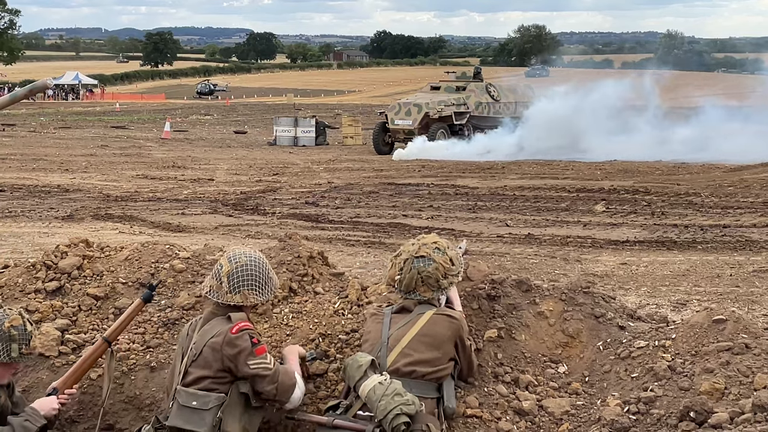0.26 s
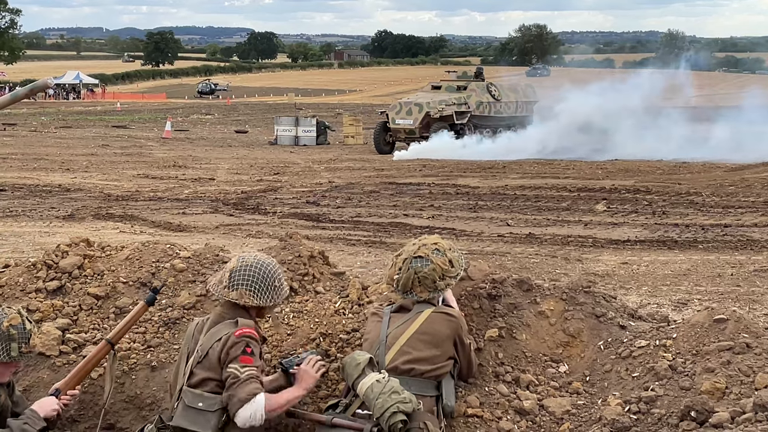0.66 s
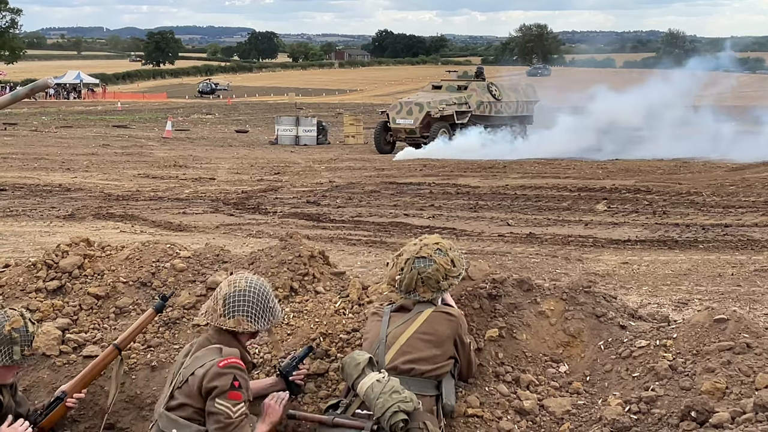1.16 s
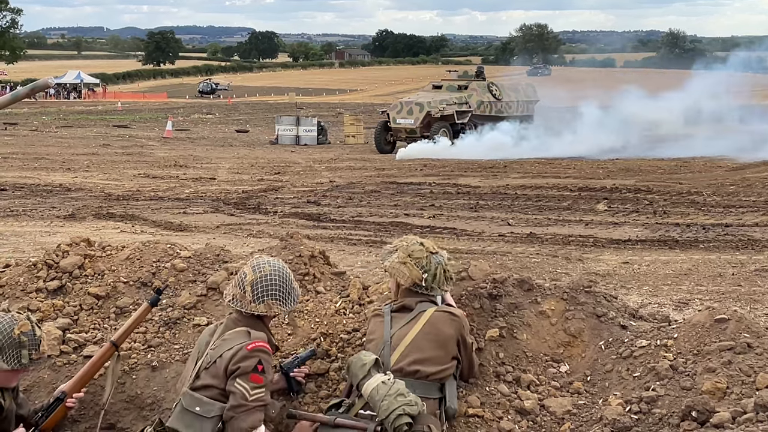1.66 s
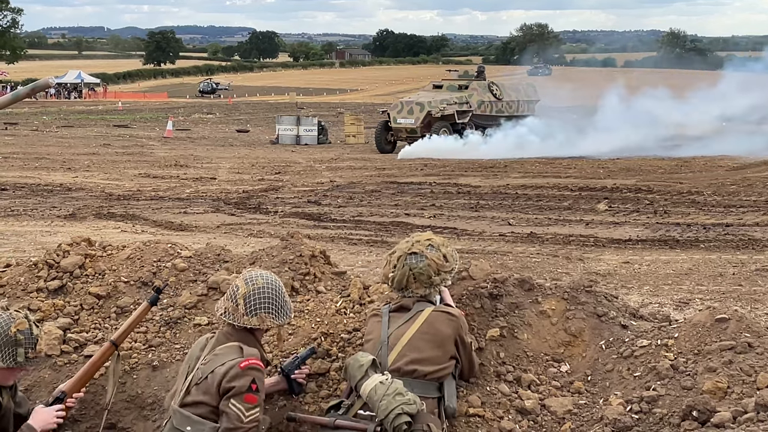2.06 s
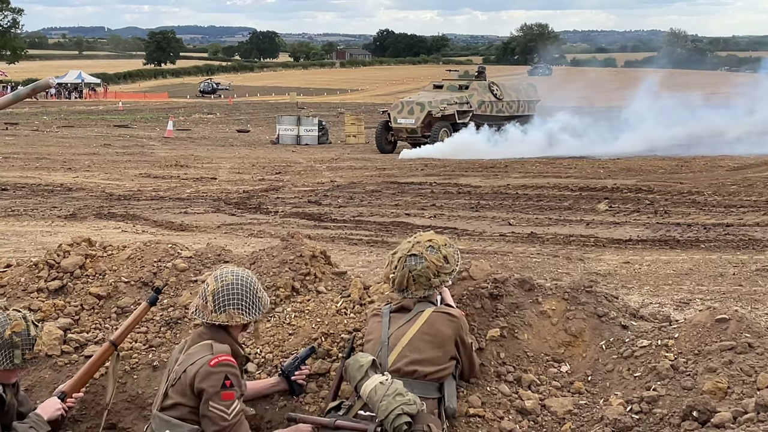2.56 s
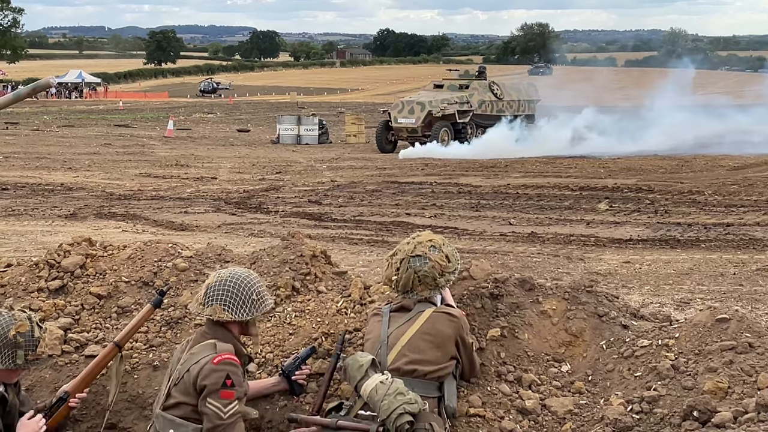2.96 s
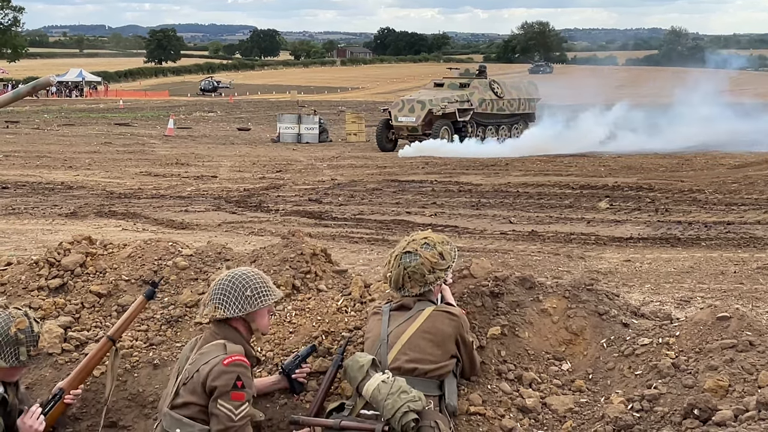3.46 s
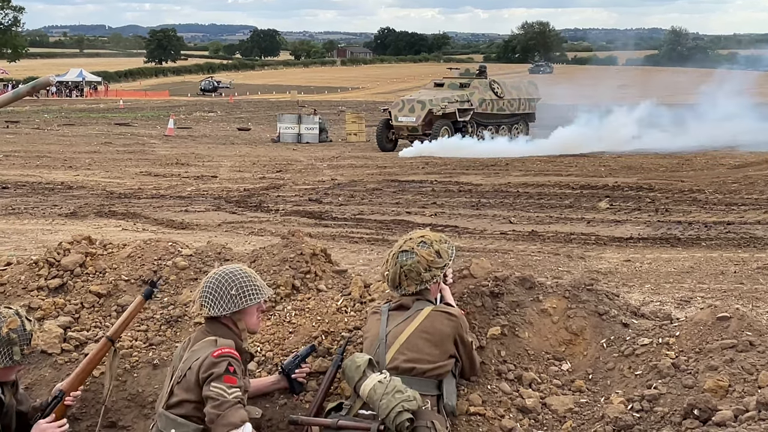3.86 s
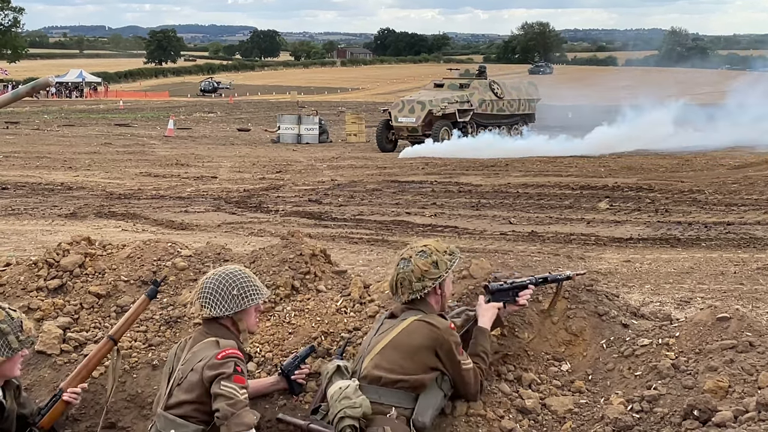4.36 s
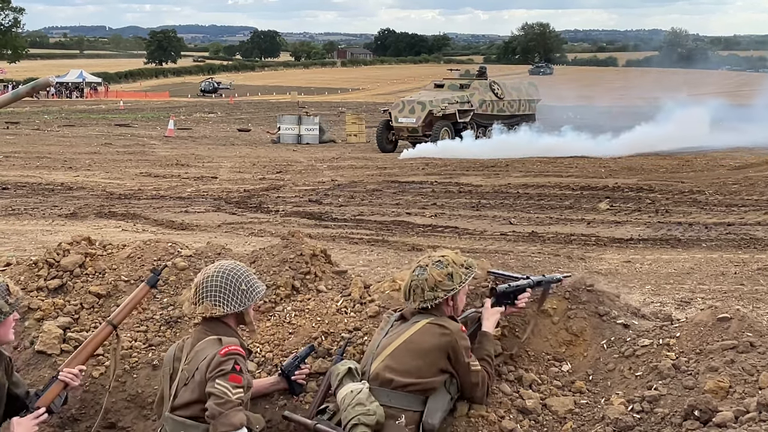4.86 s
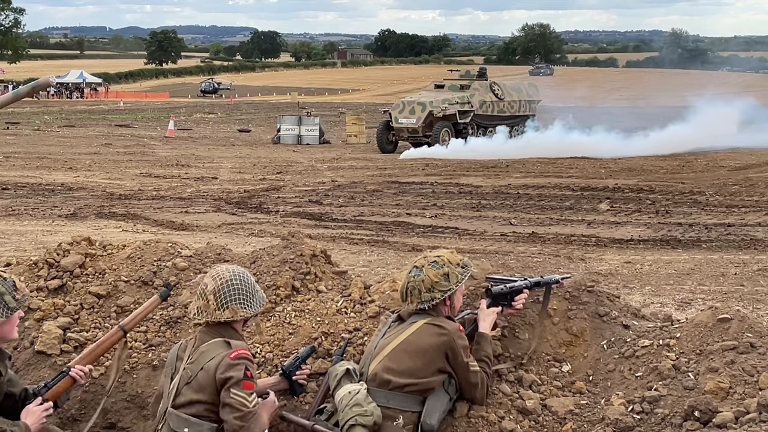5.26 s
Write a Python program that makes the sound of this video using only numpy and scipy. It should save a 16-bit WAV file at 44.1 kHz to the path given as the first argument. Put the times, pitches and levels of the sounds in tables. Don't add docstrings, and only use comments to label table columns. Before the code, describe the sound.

Blank gunfire at an outdoor display, heard on a small stereo camera near the trench. Short automatic burst first, then spaced rifle shots, a distant double boom, heavy blasts from the right and a fast six-round run at left. A closing nine-round burst overlaps heavy blasts. Echoes scatter off hedges over airy wash and a low engine idle.

```python
import sys
import numpy as np
from scipy import signal
from scipy.fft import rfft, irfft, next_fast_len
from scipy.io import wavfile
from scipy.ndimage import map_coordinates

SR = 44100
rng = np.random.default_rng(int(sys.argv[2]) if len(sys.argv) > 2 else 0)


def nominal_scale(level):
    x = np.asarray(level, float) / 20
    return 10 ** x


def to_wav(s):
    ch = np.atleast_2d(s).T
    pcm = np.round(np.clip(ch, -1, 1) * 32767)
    wavfile.write(sys.argv[1], SR, pcm.astype(np.int16))


N = 243431
M = next_fast_len(N + SR // 2)
HZ = np.fft.rfftfreq(M, 1 / SR) + 1e-3

# (time [s], crack peak [dB], thump against the crack [dB])
HEAVY_SHOTS = [
    (2.6288, -3.5, -4),
    (2.9577, -4.5, 1.5),
    (4.1031, -3, 4.5),
    (4.6727, -3, 5),
    (4.781, -0.5, -3.9),
    (4.8876, -1, 0.7),
]
# (delay [ms], pressure share [ratio,
# negative = turned over])
RIGHT_PATHS = [(0, -.2), (.25, -.2), (.45, .8), (.85, .6), (1.15, .4), (8.2, -.1)]


def along(points, hz=HZ):
    f, v = np.transpose(points)
    return np.interp(np.log(hz), np.log(f), v)


def filtered(x, response):
    return irfft(rfft(x, M) * response, M)[..., :N]


def wobble(rate):
    knots = rng.standard_normal(int(N * rate / SR) + 4)
    return map_coordinates(knots, [np.arange(N) * rate / SR])


def train(times, sizes):
    places = np.clip(np.round(times * SR).astype(int), 0, N - 1)
    return np.bincount(places, sizes, N)


def dying(power, t60, rise_ms):
    fall = signal.lfilter([1], [1, -nominal_scale(-120 / (t60 * SR))], power)
    k = np.exp(-1000 / (rise_ms * SR))
    return np.sqrt(np.abs(signal.lfilter([1 - k], [1, -k], fall)))


def diffuse(envelope, spectrum):
    # (frequency [Hz], left-right likeness [-1 to 1])
    alike = [(60, 1), (130, 0.87), (290, 1), (640, 0.28), (1400, 0.21)]
    turn = np.arccos(np.clip(along(alike), -1, 1)) / 2
    gain = nominal_scale(along(spectrum))
    gain /= np.sqrt(np.mean(gain ** 2))
    noise = envelope * rng.standard_normal((2, N))
    mid, side = filtered(noise, gain * [np.cos(turn), np.sin(turn)])
    return np.array([mid + side, mid - side])


def field(roll):
    # (time [s], level [dB])
    engine_level = [
        (0, -53.5),
        (1.5, -58.5),
        (2.4, -57),
        (3.399, -58.5),
        (4.399, -51.5),
        (5.52, -53.5),
    ]
    # (frequency [Hz], level [dB per Hz])
    engine_tone = [(20, -34), (35, -10.5), (64, 9), (100, -0.5), (200, -8), (400, -21), (800, -30),
                   (1500, -58)]
    # (frequency [Hz], level [dB per Hz])
    air_tone = [(250, -20.5), (500, -13), (900, -6), (1700, -8.5), (2200, -4.5), (3150, -11.5), (6000, -16),
                (8000, -21), (16000, -65.5)]
    still_air_db, wash_db, rumble_db = -74.5, -64, 4.5
    earlier_db, wash_t60_s = 9, 1.9
    t = np.arange(N) / SR
    earlier = nominal_scale(2 * earlier_db) * (t == 0)
    wash = nominal_scale(wash_db) * dying(roll ** 2 + earlier, wash_t60_s, rise_ms=30)

    turns = np.cumsum(24 * (1 + 0.029 * wobble(5.3))) / SR
    throb = 1 + 0.42 * np.cos(2 * np.pi * turns)
    s, engine_db = np.transpose(engine_level)
    idle = nominal_scale(np.interp(t, s, engine_db) + 3.0) * throb
    engine = np.hypot(idle, nominal_scale(rumble_db) * wash) * nominal_scale(0.67 * wobble(6.9))
    gusts_db = 1.6 * wobble(8.3) + 2.2 * wobble(45) + 2.5
    air = np.hypot(nominal_scale(still_air_db), wash) * nominal_scale(gusts_db)
    return diffuse(engine, engine_tone) + diffuse(air, air_tone)


def knocks(events, t60):
    size = 2048
    out, t = np.zeros((2, N + size)), np.arange(size) / SR
    hz = np.fft.rfftfreq(size, 1 / SR)
    for s, db, centre_hz, broad in events:
        puff = rng.standard_normal((2, size)) * nominal_scale(-60 * t / t60) * (1 - np.exp(-t / 0.00063))
        width = 1j * broad * hz * centre_hz
        body = width / (centre_hz ** 2 - hz ** 2 + width)
        ring = irfft(rfft(puff) * body ** 2)
        out[:, round(s * SR):][:, :size] += nominal_scale(db - 2.0) * ring / np.abs(ring).max()
    return out[:, :N]


def late(shots, returns):
    return [(s + delay, db, hz, broad) for s, _ in shots for delay, db, hz, broad in returns]


def small_knocks():
    # (time [s], peak [dB], centre [Hz], width [share of the centre])
    taps = [
        (0.724, -44, 765, 0.36),
        (1.383, -34, 6220, 1.3),
        (1.606, -45, 2770, 0.89),
        (1.739, -48, 2380, 0.9),
        (2.58, -55, 5500, 0.63),
        (2.601, -54, 6400, 0.3),
    ]
    return knocks(taps, t60=0.061)


def strap():
    # (time [s], peak [dB])
    slaps = [
        (3.296, -29),
        (3.306, -37.5),
        (3.313, -40.5),
        (3.319, -31.5),
        (3.328, -33),
        (3.338, -39),
        (3.345, -32),
        (3.353, -35),
        (3.361, -33),
        (3.375, -29),
    ]
    return knocks([(s, db, 2300, 4) for s, db in slaps], t60=0.031)


def gun(shots, paths, echoes, tone, push_ms, lead_us, left_db, crack_db, thump_db, roll_db):
    s, peak_db, low_db = shots
    s, (ms, share) = s[:, None], np.transpose(paths)
    jw, push = 2j * np.pi * HZ, push_ms / 1000
    blast = SR * push * jw * push / (1 + jw * push) ** 2
    low = 1 / (1 + (HZ / 600) ** 2)

    slip = rng.normal(0, 1, (len(s), len(paths), 2))
    times = s + (ms + .03 * slip[..., 0]) / 1000
    sizes = share * nominal_scale(.4 * slip[..., 1]) * nominal_scale(peak_db + crack_db)[:, None]
    strong = share > .65
    sharp = rfft(train(times.ravel(), (sizes * strong).ravel()), M)
    weak = rfft(train(times.ravel(), (sizes * ~strong).ravel()), M)
    crack = sharp + weak / (1 + (HZ / 6000) ** 2)
    thump_sizes = np.outer(nominal_scale(peak_db + low_db + thump_db), share)
    thump = rfft(train((s + ms / 1000).ravel(), thump_sizes.ravel()), M)

    bearing = np.exp(jw * lead_us * 5e-7) * nominal_scale(left_db / 2 * HZ / (HZ + 400))
    wave = ((1 - low) * crack + low * thump) * blast * nominal_scale(along(tone))
    direct = irfft(wave * [bearing, 1 / bearing], M)[:, :N]

    s = s[:, 0]
    returns = sum(train(s + delay / 1000, nominal_scale(2 * (peak_db + db))) for delay, db in echoes)
    first = train(s + 0.0013, nominal_scale(2 * peak_db))
    spray = nominal_scale(-9.5) * dying(first, 0.014, rise_ms=0.1)
    lead_in = nominal_scale(-35) * dying(first[::-1], 0.035, rise_ms=0.3)[::-1]
    scattered = dying(returns, 0.044, rise_ms=0.26)
    tail = nominal_scale(-39.5) * dying(first, 0.24, rise_ms=6)
    hiss = spray + lead_in + scattered + tail
    roll = dying(train(s + 0.0049, nominal_scale(2 * (peak_db + roll_db))), 0.45, rise_ms=2.1)
    return np.vstack([direct, hiss, roll])


def far_gun():
    # (time [s], level [dB])
    shots = [
        (1.807, -16),
        (1.882, -15.5),
    ]
    # (delay [ms], pressure share [ratio, negative = turned over])
    paths = [(-.3, -.2), (-.05, -.25), (.25, .55), (.7, .35), (2, -.2), (7.85, -.12)]
    # (delay [ms], level against the crack [dB])
    echoes = [(3, -16.5), (12.6, -5), (18, -16.5), (44, -26.5), (78, -26), (122, -35.5)]
    # (frequency [Hz], level [dB])
    tone = [(60, 8), (150, 12.5), (400, 8.5), (900, 2), (2000, 0.6), (3500, 6.5), (6000, -42),
            (11000, -27.5), (16000, -37)]
    # (delay [s], peak [dB], centre [Hz], width [share of the centre])
    returns = [
        (.261, -50.5, 2540, 1.1),
        (.379, -45, 3060, .9),
        (.538, -46.5, 930, .95),
        (.672, -44.5, 820, 1.1),
    ]
    blasts = gun([*np.transpose(shots), 0], paths, echoes, tone, push_ms=4.3, lead_us=20,
                 left_db=4.0, crack_db=15.0, thump_db=1, roll_db=-15.5)
    return blasts, knocks(late(shots, returns), t60=0.053)


def right_rifle():
    # (time [s], level [dB])
    shots = [
        (1.2903, -6),
        (1.5528, -6),
    ]
    # (delay [ms], level against the crack [dB])
    echoes = [(6, -31), (42, -33.5), (56, -32.5), (93, -49), (145, -45.5), (166, -52)]
    # (frequency [Hz], level [dB])
    tone = [(60, 10), (150, 2.4), (400, 3.5), (900, -2), (2000, 5), (3500, 10.5), (6000, 9), (11000, 5),
            (16000, -17.5)]
    return gun([*np.transpose(shots), 0], RIGHT_PATHS, echoes, tone, push_ms=0.96, lead_us=-170,
               left_db=5.5, crack_db=6.5, thump_db=-1, roll_db=-29)


def single_rifle():
    # (time [s], level [dB])
    shots = [
        (1.0654, -0.92),
    ]
    # (delay [ms], pressure share [ratio, negative = turned over])
    paths = [(0, -.2), (.5, .7), (1.05, .55), (1.6, .5), (5.8, -.15)]
    # (delay [ms], level against the crack [dB])
    echoes = [(6, -25.5), (22, -26), (42, -31), (70, -45.5), (95, -41.5)]
    # (frequency [Hz], level [dB])
    tone = [(60, 7.5), (150, -0.5), (400, -1), (900, -2.8), (2000, 9), (3500, -1), (6000, 5.5), (11000, -1),
            (16000, -16.5)]
    # (delay [s], peak [dB], centre [Hz], width [share of the centre])
    returns = [
        (.12, -40.5, 4020, 1.05),
        (.144, -33, 4100, 0.65),
        (.179, -37.5, 2200, 1.01),
    ]
    blasts = gun([*np.transpose(shots), 0], paths, echoes, tone, push_ms=0.89, lead_us=370,
                 left_db=7, crack_db=7.5, thump_db=-0.5, roll_db=-28.5)
    return blasts, knocks(late(shots, returns), t60=0.061)


def left_gun():
    # (time [s], level [dB])
    shots = [
        (3.5396, -3.5),
        (3.6255, -3.5),
        (3.7006, -3.5),
        (3.7752, -3.5),
        (3.8419, -3),
        (3.917, -2.5),
    ]
    # (delay [ms], pressure share [ratio, negative = turned over])
    paths = [(0, -.2), (.5, .75), (1.05, .2), (1.5, .4), (2.5, .25), (3.05, .2), (5.8, -.15)]
    # (delay [ms], level against the crack [dB])
    echoes = [(6, -44), (21, -37.5), (38, -31), (55, -39), (80, -44.5), (100, -39), (120, -41),
              (140, -41.5)]
    # (frequency [Hz], level [dB])
    tone = [(60, 3.5), (130, 2), (220, -6.5), (300, -1.5), (450, -6), (900, -6), (2000, 2), (3200, 1.5),
            (4500, 7.5), (7000, 7.5), (11000, 1.5), (16000, -8)]
    return gun([*np.transpose(shots), 0], paths, echoes, tone, push_ms=1.1, lead_us=340,
               left_db=12, crack_db=12, thump_db=3.9, roll_db=-27.5)


def heavy_gun():
    # (delay [ms], level against the crack [dB])
    echoes = [(6, -23.5), (17, -48.5), (31, -33), (68, -47), (130, -58), (175, -53.5)]
    # (frequency [Hz], level [dB])
    tone = [(60, 7.3), (150, 3.8), (400, 4.5), (900, -3), (1800, -7), (2700, -1), (4500, 7.5), (7000, 5.5),
            (11000, 3.5), (16000, -3.5)]
    return gun(np.transpose(HEAVY_SHOTS), RIGHT_PATHS, echoes, tone, push_ms=0.89, lead_us=-170,
               left_db=3.0, crack_db=7.5, thump_db=-1.0, roll_db=-31.5)


def burst():
    # (first shot [s], rounds [count], time between rounds [s])
    bursts = [
        (0.0273, 6, .09576),
        (4.4825, 9, .09588),
    ]
    cold_low_db = [0, 3]
    crack_db, thump_db = 0.18, 0
    duck_db, duck_low_db, duck_lead_s, recover_s = -4, -4, .015, .12
    s = np.concatenate([start + gap * np.arange(rounds) for start, rounds, gap in bursts])
    cold_db = np.concatenate([db * (np.arange(rounds) == 0)
                              for db, (_, rounds, _) in zip(cold_low_db, bursts)])
    since = s[:, None] - np.transpose(HEAVY_SHOTS)[0] + duck_lead_s
    duck = np.where(since > 0, np.exp(-np.abs(since) / recover_s), 0).sum(axis=1)
    return s, crack_db + duck_db * duck, thump_db + cold_db + duck_low_db * duck


def front_gun():
    # (delay [ms], pressure share [ratio, negative = turned over])
    paths = [(.4, 1.1), (.6, -.3), (1.85, .75), (2.05, -.6), (2.4, -.35), (3.65, -.2), (43.5, .085)]
    # (delay [ms], level against the crack [dB])
    echoes = [(6, -37.5), (14, -36.5), (43, -43.5), (86, -48), (98, -46.5), (367, -56), (391, -56.5)]
    # (frequency [Hz], level [dB])
    tone = [(60, 5), (150, 2.5), (400, 0.5), (540, -11.5), (740, 0), (1100, 0.5), (1700, 0.5), (2900, 4),
            (4500, -3.7), (6000, 1.1), (11000, 2.5), (16000, -8)]
    return gun(burst(), paths, echoes, tone, push_ms=2.1, lead_us=-14.5,
               left_db=1.5, crack_db=3.0, thump_db=-3.0, roll_db=-32)


def scene():
    # (frequency [Hz], level [dB per Hz])
    roll_tone = [(18, -13), (30, -9), (54, 3), (76, -6), (156, 1), (284, -5.5), (411, -11), (481, -14),
                 (900, -32), (1170, -72), (1980, -120)]
    # (frequency [Hz], level [dB per Hz])
    hiss_tone = [(150, -5.5), (400, 6), (1200, -1.5), (2200, 0), (4000, -3.5), (6000, -9), (9000, -12),
                 (12600, -29.5), (13600, -44), (16500, -54)]
    far, far_returns = far_gun()
    single, single_returns = single_rifle()
    guns = far + right_rifle() + single + left_gun() + heavy_gun() + front_gun()
    direct, hiss, roll = guns[:2], guns[2], guns[3]
    echoes = diffuse(hiss * nominal_scale(2.6 * wobble(150)), hiss_tone) + diffuse(roll, roll_tone)
    returns = far_returns + single_returns
    return field(roll) + small_knocks() + strap() + returns + echoes + direct


def band_limit(x):
    return signal.sosfilt(signal.butter(12, 17340, fs=SR, output="sos"), x)


def record(dry):
    # (frequency [Hz], left lead [rad])
    ports = [(1800, .1), (3000, .35), (6300, 0), (6950, 2.9), (8300, 2.5), (10400, .3), (12000, -.9),
             (13400, -3), (14600, -3.1), (15600, -3.8)]
    # (frequency [Hz], left lead [rad])
    bass_ports = [(40, .3), (150, .25), (300, 0)]
    cross_hz, top_hz = 1850, 16900
    below = 1 / (1 + np.exp(np.clip((HZ - cross_hz) / 25, -50, 50)))
    turn, bass = np.exp(.5j * along(ports)), np.exp(.5j * along(bass_ports))
    stereo_bass = filtered(dry, below * [bass, 1 / bass])
    one_port = filtered(0.94 * dry[1], (1 - below) * [turn, 1 / turn])
    sweep = np.exp(2j * np.pi * 1.08 * np.log(1 + 1500 / (HZ + 8)))
    x = filtered(stereo_bass + one_port, sweep / (1 + (48 / HZ) ** 4))
    x = x / (1 + np.abs(x / .96) ** 8) ** (1 / 8)
    tube = 1 + 0.83 / (1 + ((HZ - 15600) / 500) ** 2)
    x = filtered(x, tube / (1 + (HZ / top_hz) ** 120))
    return band_limit(x)


dry = scene()
out = record(dry)
to_wav(out)
```